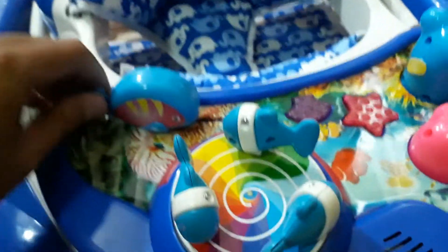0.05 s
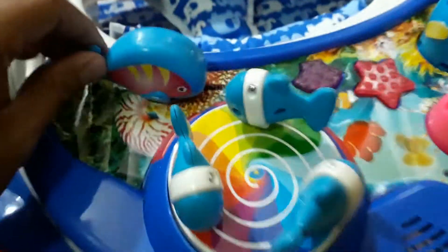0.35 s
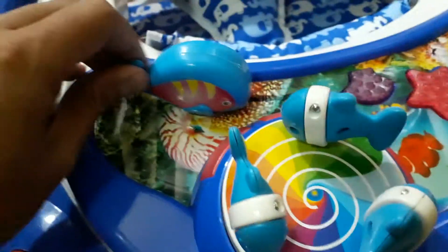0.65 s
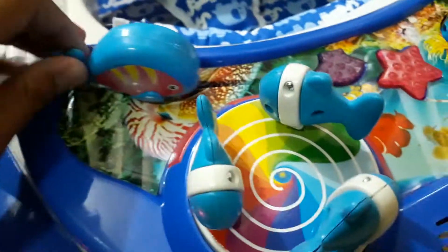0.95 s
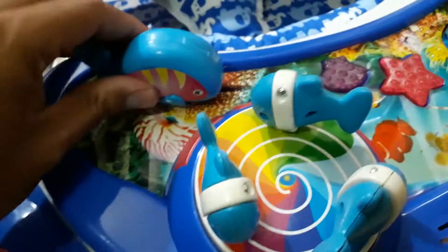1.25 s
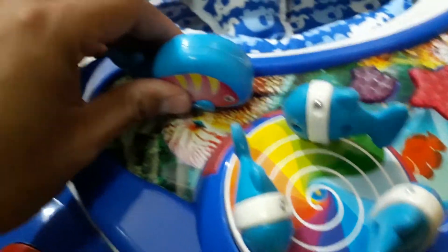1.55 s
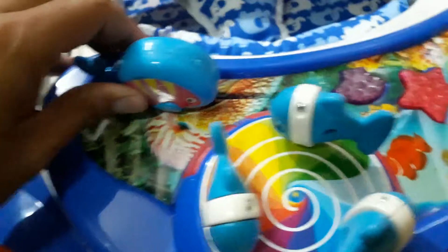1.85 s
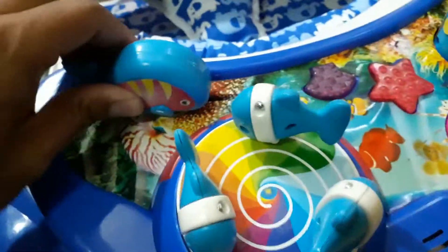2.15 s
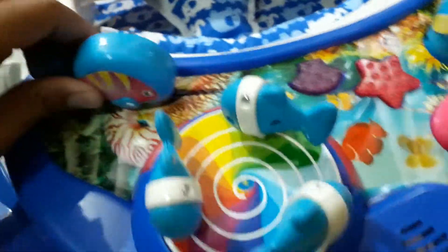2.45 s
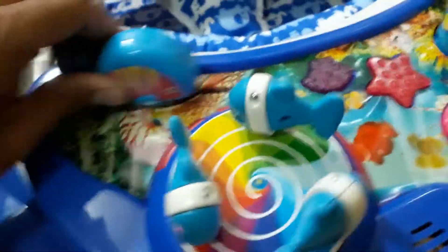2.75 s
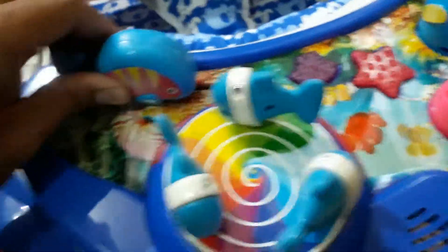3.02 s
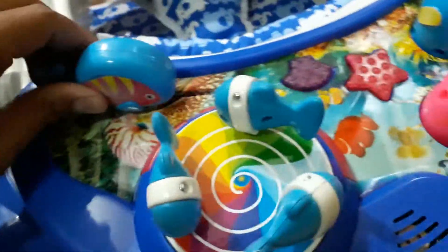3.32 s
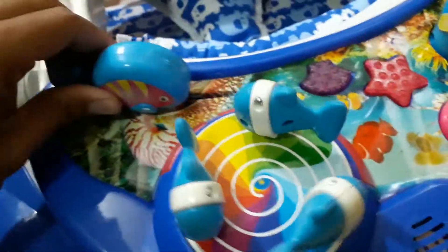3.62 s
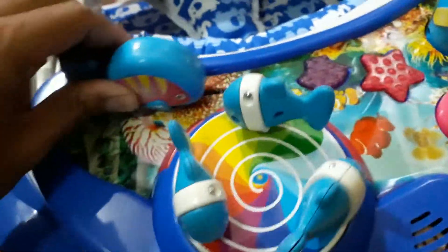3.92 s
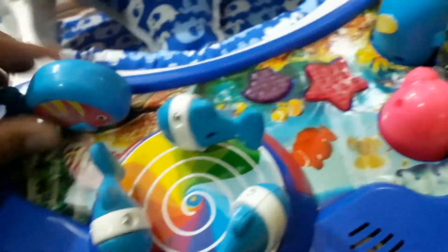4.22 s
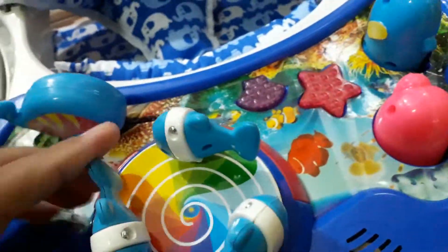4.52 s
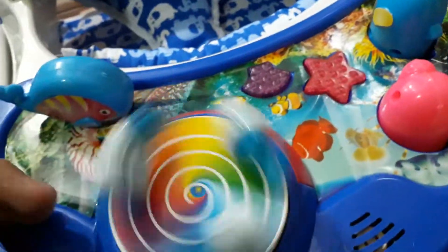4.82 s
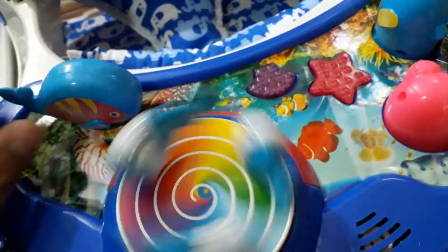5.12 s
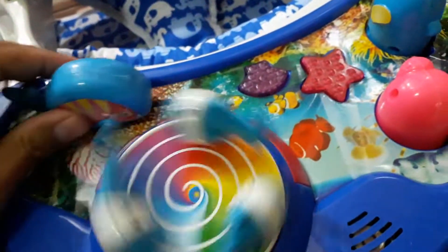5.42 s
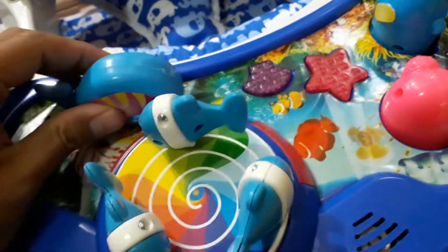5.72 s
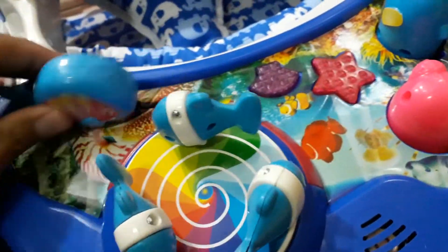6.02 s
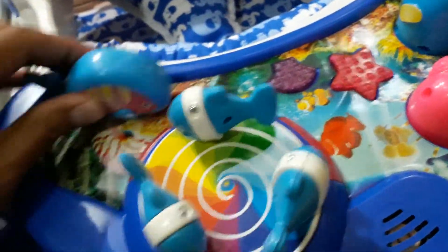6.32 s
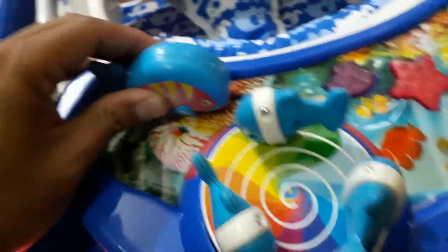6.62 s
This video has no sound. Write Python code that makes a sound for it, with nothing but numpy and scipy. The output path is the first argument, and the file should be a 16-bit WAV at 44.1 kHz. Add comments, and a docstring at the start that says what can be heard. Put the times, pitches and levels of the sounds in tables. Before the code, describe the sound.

Close, hard plastic snaps come at an uneven pace as a toy fish is pushed over its catch and slides back into its seat, ringing the hollow tray. A spinner then turns with a dry, low rattle and several sharp knocks. It stops, and the fish clicks again, ending in small taps. Soft hum and hiss fill the small room behind it.

```python
"""Plastic fish and spinner on a baby's activity tray

A hand rocks a hollow fish, close by, in a small room with a low hum. Each push scrapes, catches, snaps
over a detent and rebounds; on the way back the fish slides and drops into its seat. Midway a finger
flicks a spinner, which rumbles and knocks until stopped. The contacts ring the tray's plastic shell."""
import sys
import numpy as np
from scipy import signal
from scipy.fft import rfft, irfft
from scipy.io import wavfile
from scipy.ndimage import uniform_filter1d

SR = 44100
rng = np.random.default_rng(int(sys.argv[2]) if len(sys.argv) > 2 else 0)


def unload_wav(signal):
    """Save mono or channel-first audio to the path in sys.argv[1] as 16-bit WAV at rate SR, clipped to [-1, 1]."""
    wavfile.write(
        sys.argv[1],
        SR,
        np.round(np.clip(np.atleast_2d(signal).T, -1, 1) * 32767).astype(np.int16),
    )


N = 302526
TIME = np.arange(N) / SR
LN_1000 = np.log(1000)  # 60 dB of decay

# broad colour of the shell: (frequency [Hz], level [dB])
SHELL_COLOUR = [(50, -51), (120, -40), (210, -14.5), (360, -7.5), (430, -1), (900, -1), (1250, 0.5),
                (1600, -1), (2400, 5), (3300, 1.5), (4800, -3.5), (6500, -13.5), (9300, -24), (11300, -21),
                (15500, -33.5)]
# pushes over the detent: (snap time [s], snap [dB], pitch [Hz], pitch lift [dB], scrape lead [s],
# scrape [dB], catch [dB], rebound delay [s], rebound [dB], spring ring [dB])
DETENT_PUSHES = [(0.7365, -8.5, 3240, 18, 0.036, -27, -35, 0.03, -32, -57),
                 (1.1652, -10.5, 2720, 12, 0.036, -32, -39, 0.041, -26.5, -52),
                 (2.0736, -6.5, 2130, 11, 0.034, -29, -15.5, 0.044, -40, -46),
                 (2.522, -7, 2900, 11.5, 0.024, -26.5, -16, 0.032, -21.5, -43),
                 (2.9447, -5.5, 2800, 8, 0.022, -30, -16, 0.034, -23, -58),
                 (3.3417, -7, 2600, 7.5, 0.026, -33.5, -18.5, 0.035, -25, -47),
                 (3.7577, -5, 2640, 6, 0.0243, -29.5, -17.5, 0.0347, -26, -47),
                 (6.0476, -5, 2580, 25, 0.06, -29.5, -15, 0.007, -15, -43),
                 (6.2815, -8, 2600, 19, 0.014, -28, -41, 0.04, -28.5, -45)]


def gain_of(db):
    """Decibels to amplitude."""
    return 10 ** (np.asarray(db) / 20)


def unit_rms(x):
    """Scales to rms 1."""
    return x / np.sqrt(np.mean(x ** 2) + 1e-20)


def at_hz(points, hz):
    """Interpolates a table on a log-frequency axis."""
    f, value = np.transpose(points)
    return np.interp(np.log(hz + 1), np.log(f + 1), value)


def envelope(rows, column):
    """One dB column of a time table as gain per sample."""
    rows = np.array(rows)
    return gain_of(np.interp(TIME, rows[:, 0], rows[:, column]))


def add(mix, time_s, sound):
    """Mixes a sound in at time_s."""
    part = mix[max(round(time_s * SR), 0):][:len(sound)]
    part += sound[:len(part)]


def noise(colour):
    """Steady coloured noise, rms 1."""
    gain = gain_of(at_hz(colour, np.fft.rfftfreq(N, 1 / SR)))
    return unit_rms(irfft(rfft(rng.standard_normal(N)) * gain, N))


def drift(rate_hz):
    """Slow random wander, rms 1."""
    lowpass = np.exp(-(np.fft.rfftfreq(N, 1 / SR) / rate_hz) ** 2)
    return unit_rms(irfft(rfft(rng.standard_normal(N)) * lowpass, N))


def ambience(hum_hz=101, waver_rad=0.87, throb_db=3, hum_trim_db=1, hiss_trim_db=4):
    """Room noise: throbbing hum, low rumble, soft hiss."""
    # (time [s], hum [dB], rumble [dB], hiss [dB])
    levels = [(0.0, -49.5, -46, -51.5), (0.4, -42.5, -46.5, -50.5), (1.41, -51, -51, -58),
              (2.33, -48.5, -51.5, -54.5), (2.81, -57, -59.5, -57.5), (4.68, -55.5, -52, -58),
              (5.37, -49, -49, -50.5), (6.86, -53.5, -54.5, -57)]
    # noise spectra: (frequency [Hz], level [dB])
    rumble_colour = [(20, -42), (42, -15.5), (72, -16.5), (90, -18), (135, 4.5), (165, -1), (200, -14.5),
                     (300, -13), (600, -53), (2000, -74)]
    hiss_colour = [(120, -49), (220, -1.5), (500, 1), (1050, -3.5), (2200, -4), (4800, -6.5), (7000, -18.5),
                   (9800, -23), (12300, -18.5), (13200, -24), (16000, -29)]
    throb = gain_of(throb_db * drift(rate_hz=8))
    phase = 2 * np.pi * hum_hz * TIME + waver_rad * drift(rate_hz=13)
    hum = gain_of(hum_trim_db) * unit_rms(np.sin(phase) * throb) * envelope(levels, 1)
    rumble = noise(rumble_colour) * envelope(levels, 2)
    hiss = gain_of(hiss_trim_db) * noise(hiss_colour) * envelope(levels, 3)
    return hum + rumble + hiss


def whine(pitch_hz=2200, level_db=-67.5, waver_rad=0.6):
    """Faint, slightly wavering tone in the room."""
    phase = 2 * np.pi * pitch_hz * TIME + waver_rad * drift(rate_hz=6.5)
    return gain_of(level_db) * unit_rms(np.sin(phase))


def reverb(x, wet_db=-14.5, build_s=0.0076):
    """Diffuse room tail: fast build-up, each band dying at its own rate."""
    # tail spectrum: (frequency [Hz], level [dB])
    colour = [(150, 16), (450, 9.5), (1000, 6.5), (2000, 0), (2600, -3), (3600, -2), (12000, 0)]
    # reverberation time: (frequency [Hz], t60 [s])
    t60_s = [(200, 0.33), (800, 0.13), (2300, 0.37), (5500, 0.25), (14000, 0.38)]
    hz, t, bins = signal.stft(rng.standard_normal(SR // 2), SR, nperseg=256)
    decay = np.exp(-LN_1000 * t / at_hz(t60_s, hz)[:, None])
    tail = signal.istft(bins * gain_of(at_hz(colour, hz))[:, None] * decay, SR, nperseg=256)[1]
    tail *= 1 - np.exp(-(np.arange(len(tail)) / SR / build_s) ** 2)
    return gain_of(wet_db) * signal.fftconvolve(x, tail / np.linalg.norm(tail))[:N]


def shell(colour, size=4096):
    """Minimum-phase impulse response of the hollow tray: broad colour plus resonances."""
    # resonances, negative lift = antiresonance: (frequency [Hz], width [Hz], lift [dB])
    modes = [(420, 50, 2), (500, 60, 3), (575, 55, 5), (820, 80, 5), (1340, 55, 5), (1420, 60, 4),
             (1725, 70, 3), (1885, 90, 4), (2135, 80, 3), (2320, 50, 3), (2440, 50, 3), (2555, 90, 5),
             (2680, 45, -6), (2830, 90, 2), (3000, 80, 5), (3298, 70, 5), (4000, 110, 3), (4690, 110, 4),
             (5800, 80, 3), (6590, 130, 3)]
    hz = abs(np.fft.fftfreq(size, 1 / SR))
    modes_db = sum(lift / (1 + (2 * (hz - f) / width) ** 2) for f, width, lift in modes)
    log_gain = np.log(gain_of(at_hz(colour, hz) + modes_db))
    spectrum = np.exp(np.conj(signal.hilbert(log_gain)))
    return np.fft.ifft(spectrum).real[:size // 2]


def slips(per_s, spread_db):
    """Random impulse train of small slips, a few of them large."""
    strength = gain_of(spread_db * np.minimum(rng.exponential(1, N), 3))
    return (rng.random(N) < per_s / SR) * rng.choice([-1, 1], N) * strength


def ticks(per_s, decay_s=0.0065):
    """Light random touches on the shell, rms 1."""
    t = np.arange(SR // 20) / SR
    scuff = rng.standard_normal(len(t)) * np.exp(-t / decay_s)
    tick = signal.fftconvolve(scuff, shell(SHELL_COLOUR))
    return unit_rms(signal.fftconvolve(slips(per_s, spread_db=1), tick)[:N])


def contact(level_db, bass_db, treble_db, pitch_hz, lift_db, t60_s, size=8192):
    """One hit: a crack, then a gritty rattle dying away through the struck part and the shell."""
    t = np.arange(size) / SR
    rattle, grit = rng.standard_normal((2, size))
    grit_db = 1.5 * unit_rms(uniform_filter1d(grit, size=30))
    bite_s = 0.0038 * t60_s  # a long scrape takes a moment to bite
    rattle *= gain_of(grit_db) * (1 - np.exp(-t / bite_s))
    rattle[0] = 0.095 / t60_s  # a short snap is mostly crack
    part_ring = signal.lfilter(*signal.iirpeak(pitch_hz, Q=4.4, fs=SR), rattle)
    rattle += (gain_of(lift_db) - 1) * part_ring
    # plastic damps bass last: (filter, edges [Hz], level [dB], t60 [s])
    bands = [("low", 1100, bass_db, 1.355 * t60_s),
             ("band", (1100, 5000), 0, t60_s),
             ("high", 5000, treble_db, t60_s)]
    body, out = shell(SHELL_COLOUR), np.zeros(size)
    for kind, edges_hz, band_db, band_t60_s in bands:
        decay_s = band_t60_s / LN_1000
        ring = signal.fftconvolve(rattle * np.exp(-t / decay_s), body)[:size]
        band = signal.sosfilt(signal.butter(5, edges_hz, kind, fs=SR, output="sos"), ring)
        energy = decay_s * SR / 2  # a longer ring carries more
        out += gain_of(band_db) * band / np.linalg.norm(band) * np.sqrt(energy)
    return gain_of(level_db) * out


def grip(level_db=-68):
    """Faint ticks as the fingers shift their grip."""
    return gain_of(level_db) * ticks(per_s=8)


def hand_bumps(t60_s=0.034, rise_s=0.00095):
    """Soft flesh pushes the tray, which sways low and briefly."""
    # (time [s], level [dB], pitch [Hz])
    bumps = [(0.26, -34, 132), (6.762, -24.5, 146)]
    t, out = np.arange(SR // 4) / SR, np.zeros(N)
    sway = (1 - np.exp(-t / rise_s)) * np.exp(-LN_1000 * t / t60_s)
    for time_s, db, hz in bumps:
        add(out, time_s, gain_of(db) * np.cos(2 * np.pi * hz * t) * sway)
    return out


def light_taps(base_t60_s=0.041, base_treble_db=-14, halving_db=17.5):
    """Light taps, rattles and small rebounds on the plastic; brighter ones die sooner."""
    # (time [s], level [dB], bass re level [dB], treble re level [dB], pitch [Hz])
    taps = [(0.1018, -37.5, -2.5, -14, 804), (0.167, -36.5, -1.5, -15, 770), (0.2622, -34.5, 6.5, -8, 447),
            (0.3154, -42, 1, 4, 580), (0.343, -40, 1, -13, 1420), (0.3584, -43.5, 9, -14, 570),
            (0.4287, -34.5, -7, -7, 2000), (0.6382, -35, 0, -10, 410), (0.6626, -40, 8.5, -9, 610),
            (0.9701, -45, 11, 7.5, 453), (1.0305, -36, 0.5, -16, 2100), (1.3815, -35, -0.5, -8, 420),
            (1.688, -38.5, -3, -16, 420), (1.8434, -46, 7.5, -23, 446), (2.2877, -35.5, -3, -18, 430),
            (2.461, -38.5, -4.5, -31, 1830), (2.6465, -47.5, 9.5, -18, 586), (4.16, -38, 5.5, -2.5, 750),
            (4.5764, -37.5, 1, -29, 895), (4.667, -34.5, 0, -17, 810), (4.9505, -33.5, 0.5, -12, 820),
            (5.328, -37, -13, -19, 2680), (5.3516, -30.5, 0, -18, 450), (5.5052, -31.5, -1.5, -19, 920),
            (5.539, -35, -4, -11, 470), (6.4404, -46, 11, -21, 645), (6.457, -40.5, 0, -11, 3020),
            (6.553, -37, -3, -14, 3120), (6.684, -39.5, 2.5, -10, 3050), (6.7302, -41, 2, -25, 1900)]
    for time_s, db, bass_db, treble_db, hz in taps:
        t60_s = base_t60_s * 2 ** ((base_treble_db - treble_db) / halving_db)
        yield time_s, contact(db, bass_db, treble_db, pitch_hz=hz, lift_db=11, t60_s=t60_s)


def spinner_rumble(wobble_db=3, tick_db=-11):
    """The dry axle stutters in its socket and drums on the tray; the loose wheel ticks on its hub."""
    # turning, flick to stop: (time [s], level [dB])
    spin = [(4.5, -85), (4.58, -48), (4.72, -42.5), (4.84, -70), (4.92, -40.5), (5.1, -45.5), (5.25, -39),
            (5.47, -43.5), (5.62, -36.5), (5.8, -75)]
    # axle spectrum: (frequency [Hz], level [dB])
    axle_colour = [(100, -16.5), (220, -7.5), (400, 0), (550, -0.5), (950, 2), (1200, -14.5), (2700, -16.5),
                   (5000, -33), (8000, -35), (15000, -52)]
    stutter = slips(per_s=320, spread_db=3.5)
    rumble = unit_rms(signal.fftconvolve(stutter, shell(axle_colour))[:N])
    wobble = gain_of(wobble_db * drift(rate_hz=82))
    hub_ticks = gain_of(tick_db) * ticks(per_s=39)
    return (rumble * wobble + hub_ticks) * envelope(spin, 1)


def spinner_knocks(rub_lead_s=0.0039):
    """The wheel tips in its bearing: the rim rubs, rings on one side, hits deeper on the other."""
    # (time [s], level [dB], pitch [Hz], pitch lift [dB], rub [dB],
    # second hit delay [s], second hit [dB], treble re second hit [dB])
    knocks = [(4.8765, -16.5, 2640, 8, -30, 0.0066, -18.5, -9),
              (5.2026, -15.5, 3070, 14, -63, 0.0073, -14, -15.5),
              (5.3953, -18, 2800, 25, -56, 0.029, -27.5, -8),
              (5.438, -15, 2320, 24, -25.5, 0.029, -23.5, -26),
              (5.5703, -18.5, 1830, 21, -19.5, 0.009, -11.5, -2.5),
              (5.62, -11, 3920, 7, -52, 0.016, -31, -6)]
    for time_s, db, hz, lift_db, rub_db, delay_s, second_db, treble_db in knocks:
        yield time_s - rub_lead_s, contact(
            rub_db, bass_db=-5.5, treble_db=-20, pitch_hz=760, lift_db=7.5, t60_s=0.14)
        yield time_s, contact(
            db, bass_db=-7.5, treble_db=-17.5, pitch_hz=hz, lift_db=lift_db, t60_s=0.037)
        yield time_s + delay_s, contact(
            second_db, bass_db=-3.5, treble_db=treble_db, pitch_hz=920, lift_db=8, t60_s=0.033)


def return_spring():
    """Each snap rings the spring: thin, metallic, longer than the plastic."""
    # (frequency [Hz], level [dB], t60 [s])
    modes = [(2476, 0, .33), (3512, -6, .55)]
    t, out = np.arange(SR // 2) / SR, np.zeros(N)
    ring = sum(gain_of(db) * np.sin(2 * np.pi * hz * t) * np.exp(-LN_1000 * t / t60_s)
               for hz, db, t60_s in modes)
    for time_s, *_, ring_db in DETENT_PUSHES:
        add(out, time_s, gain_of(ring_db) * ring)
    return out


def fish_clacks():
    """Single hard hits of the loose fish on its mount."""
    # (time [s], level [dB], treble re level [dB], pitch [Hz], pitch lift [dB], t60 [s])
    clacks = [(0.679, -20, -15, 1150, 9.5, 0.08), (0.717, -12.5, -10.5, 3220, 6, 0.098),
              (0.7244, -11.5, -25, 805, 4, 0.059), (0.7485, -10.5, -23, 2280, 25, 0.015),
              (1.1509, -23.5, -23, 550, -7, 0.072), (2.0584, -19.5, -18, 3270, 5, 0.058),
              (3.1543, -30, 0, 514, 28, 0.031), (3.1959, -31, -12, 1340, 14, 0.028),
              (4.2245, -28, -12.5, 4500, 6, 0.05), (4.5104, -31.5, -32, 600, -6, 0.025),
              (4.5995, -30, -16.5, 1010, 6.5, 0.13), (5.896, -24.5, -19, 2000, 23, 0.052),
              (5.939, -17, -16, 2580, 10, 0.034), (5.9529, -24, -11.5, 1080, 8, 0.16),
              (5.9589, -10, -27, 520, 11, 0.017), (6.814, -27.5, -5, 4070, 12, 0.092),
              (6.8171, -21, -10.5, 1900, 14, 0.067)]
    for time_s, db, treble_db, hz, lift_db, t60_s in clacks:
        yield time_s, contact(
            db, bass_db=-4, treble_db=treble_db, pitch_hz=hz, lift_db=lift_db, t60_s=t60_s)


def fish_returns(settle_s=0.023, hard_seat_db=-18):
    """The fish ticks free, slides back, drops into its seat and rocks once more."""
    # (time [s], release [dB], slide [dB], travel [s], seating [dB], seating pitch [Hz], settling [dB])
    strokes = [(1.7478, -23, -33.5, 0.03, -22, 4030, -33), (2.3343, -25, -27, 0.023, -16.5, 3860, -18.5),
               (2.743, -49, -30.5, 0.031, -20, 1030, -27), (3.1385, -32, -29.5, 0.035, -25, 2180, -38),
               (3.5281, -29, -29, 0.047, -32.5, 750, -36), (3.9923, -25, -33, 0.029, -31.5, 2050, -55)]
    for time_s, release_db, slide_db, travel_s, seat_db, hz, settle_db in strokes:
        treble_db = -7.5 + 0.7 * (seat_db - hard_seat_db)  # a harder drop is brighter
        yield time_s, contact(
            release_db, bass_db=-18.5, treble_db=-10.5, pitch_hz=1930, lift_db=4, t60_s=0.076)
        yield time_s, contact(
            slide_db, bass_db=-1.5, treble_db=-14, pitch_hz=2050, lift_db=11.5, t60_s=0.17)
        yield time_s + travel_s, contact(
            seat_db, bass_db=-4.5, treble_db=treble_db, pitch_hz=hz, lift_db=3.5, t60_s=0.076)
        yield time_s + travel_s + settle_s, contact(
            settle_db, bass_db=-10, treble_db=-37, pitch_hz=2050, lift_db=10, t60_s=0.042)


def fish_pushes(catch_lead_s=0.0056):
    """The pawl scrapes up its ramp, catches, snaps over; the hollow fish rebounds with a dull knock."""
    for time_s, snap_db, hz, lift_db, lead_s, scrape_db, catch_db, delay_s, rebound_db, _ in DETENT_PUSHES:
        yield time_s - lead_s, contact(
            scrape_db, bass_db=-3.5, treble_db=-14.5, pitch_hz=1930, lift_db=10, t60_s=0.17)
        yield time_s - catch_lead_s, contact(
            catch_db, bass_db=-6.5, treble_db=-6.5, pitch_hz=420, lift_db=3, t60_s=0.064)
        yield time_s, contact(
            snap_db, bass_db=-16, treble_db=-10, pitch_hz=hz, lift_db=lift_db, t60_s=0.024)
        yield time_s + delay_s, contact(
            rebound_db, bass_db=3.5, treble_db=-14, pitch_hz=570, lift_db=14.5, t60_s=0.017)


def scene(contact_trim_db=0.21):
    """The toy close by, its reverb and the room noise; mono."""
    hits = np.zeros(N)
    for source in (fish_pushes, fish_returns, fish_clacks, spinner_knocks, light_taps):
        for time_s, hit in source():
            add(hits, time_s, hit)
    toy = gain_of(contact_trim_db) * hits + return_spring() + spinner_rumble() + grip() + hand_bumps()
    return (toy + reverb(toy) + ambience() + whine())[None]


def record(dry):
    """Clip at full scale, then low-pass."""
    cutoff_hz = 16200
    lowpass = signal.firwin(511, cutoff_hz, window=("kaiser", 9), fs=SR)
    return signal.oaconvolve(np.clip(dry, -1, 1), lowpass[None], "same")


dry = scene()
out = record(dry)
unload_wav(out)
```